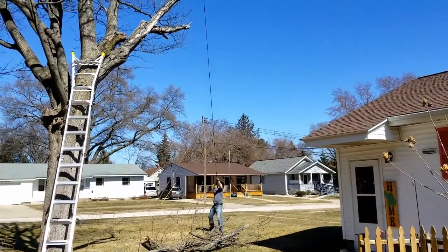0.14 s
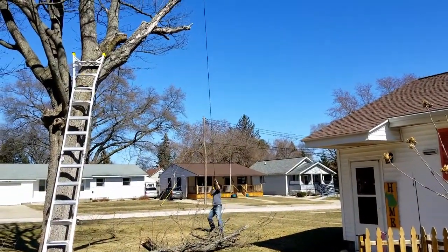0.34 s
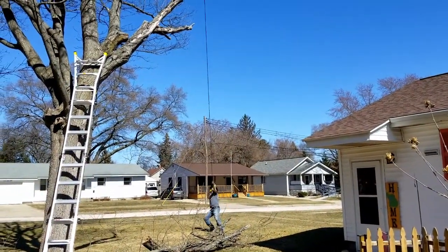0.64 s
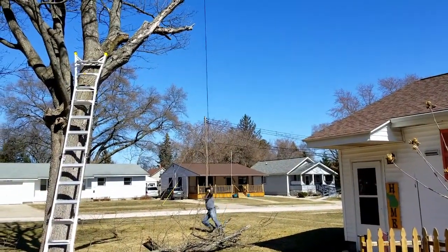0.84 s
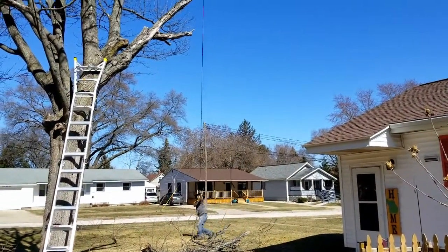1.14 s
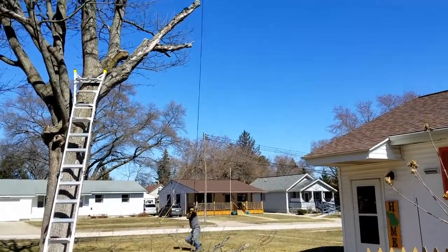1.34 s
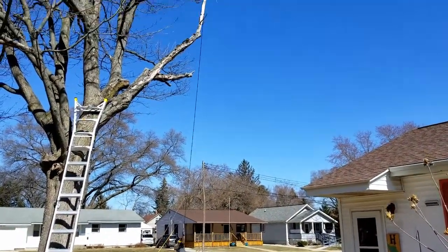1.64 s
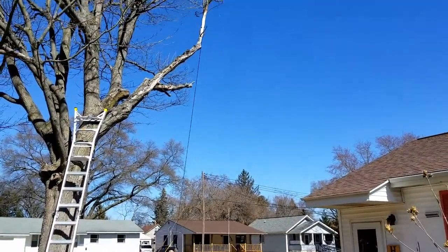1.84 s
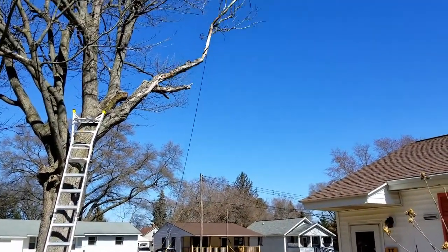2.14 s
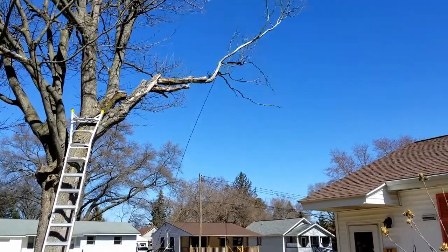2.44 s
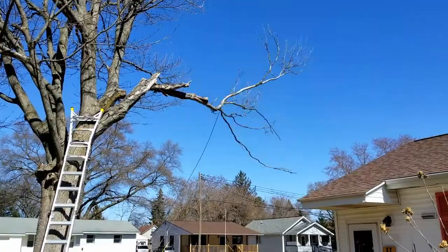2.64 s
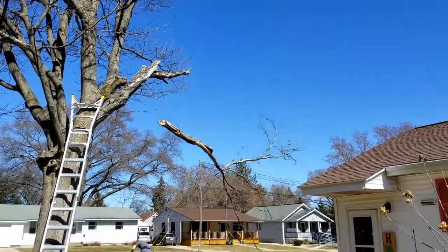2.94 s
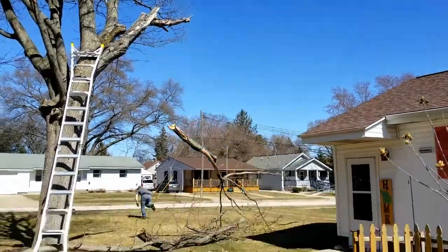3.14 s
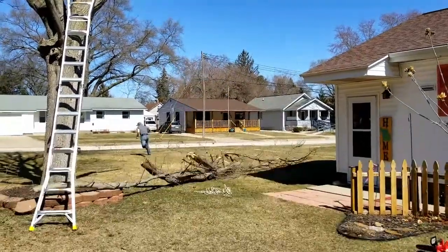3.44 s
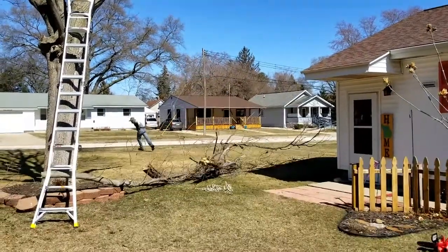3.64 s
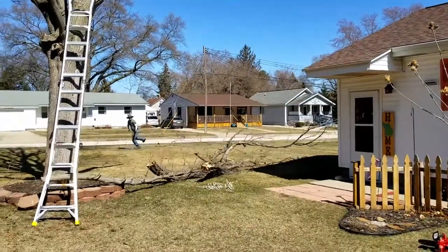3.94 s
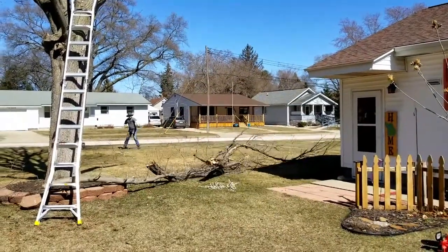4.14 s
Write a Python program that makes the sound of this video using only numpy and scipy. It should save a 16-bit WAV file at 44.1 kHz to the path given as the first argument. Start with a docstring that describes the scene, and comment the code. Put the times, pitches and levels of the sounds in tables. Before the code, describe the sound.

Loud wood cracks echo off nearby houses, a brief hush follows, then a heavy branch hits grass with clattering thuds and snapping twigs.

```python
"""A sawn limb tears off a yard tree: its hinge wood cracks in steps as bursts of tiny fractures
drive filters, over a ringing limb. Its twigs rustle, then snap and crackle on the lawn as noise grains
through resonances; the heavy wood knocks, bounces, scrapes and settles. Houses throw it back as filtered
echoes. Behind it, shaped noise makes a breeze rumbling on two microphones, traffic murmur and
airy hiss, and a far bird calls twice in wavering harmonics."""
import sys
import numpy as np
from scipy import signal
from scipy.fft import rfft, irfft, next_fast_len
from scipy.io import wavfile
from scipy.ndimage import uniform_filter1d, minimum_filter1d

SR = 44100
rng = np.random.default_rng(int(sys.argv[2]) if len(sys.argv) > 2 else 0)


def transcribe(u):
    """Save the signal u as a 16-bit wav file named by the first command-line argument.

    u: samples, shape (n,) or (channels, n), limited to [-1, 1]; the rate is SR.
    q: integer samples, one column per channel.
    """
    v = np.clip(np.atleast_2d(u).T, -1, 1)
    q = np.round(v * 32767).astype(np.int16)
    wavfile.write(sys.argv[1], SR, q)


N = 189674
T = np.arange(N) / SR
HIT = T[:SR // 3]  # time axis of one short event

# fibre bundles breaking in the hinge
# (time [s], tear level [dB], ring level [dB], splinter level [dB], tear pitch [Hz], decay [s])
CRACKS = [(0.4882, -34.5, -37.5, -37, 1630, .012), (0.587, -43, -49, -43, 1640, .012),
          (0.619, -15.5, -24.5, -28, 2720, 0.0059), (0.7556, -20.5, -23.5, -30.5, 1550, 0.0071),
          (0.8952, -11, -11.5, -22.5, 2970, 0.0094), (0.983, -22, -32, -30.5, 1075, 0.0045),
          (1.0095, -29.5, -45, -40.5, 1090, 0.0047), (1.024, -15.5, -30.5, -25.5, 1790, 0.0042),
          (1.076, -33.5, -41, -40, 1790, 0.0046), (1.823, -44, -39, -40, 1165, 0.0054),
          (1.833, -21.5, -32.5, -29, 1290, 0.0046), (1.8585, -2.5, -4.5, -10.5, 1900, .0036),
          (1.8649, -10.5, -38, -18, 1350, 0.0047), (1.887, -23.5, -24, -20, 1160, 0.006),
          (2.607, -39.5, -49, -52, 1170, 0.021), (2.642, -44.5, -52.5, -48, 1720, 0.015)]
# the limb while still on the tree (frequency [Hz], level at 0 dB ring [dB], fall by 60 dB [s])
HINGE_MODES = [(420, 3, .085), (598, 0, .07), (665, -6, .06)]
# weak breaks stir the upper modes more (dB per octave, for each dB under full strength)
RING_TILT = 0.56
# higher bending modes of the limb, stirred by tearing (frequency [Hz], width [Hz], level [dB])
TEAR_MODES = [(1070, 130, 3), (1198, 97, 6), (1420, 26, -5.5), (1700, 234, 3.5), (2426, 91, -7),
              (3145, 34, -4.5)]
# spectra of tearing wood and of flying splinters (frequency [Hz], relative level [dB])
TEAR_COLOUR = [(300, -42), (700, 7.5), (1100, -3.5), (1700, -5.5), (2100, -5.5), (2900, -6), (3900, -22.5),
               (6000, -30)]
SPLINTER_COLOUR = [(1000, -64.5), (3000, 7), (4600, 4), (6500, 0.5), (9000, -3), (12500, 2.5), (16000, -9)]
# only a tear slower than FLEX_S has time to flex the whole limb; level against the ring
FLEX_DB, FLEX_S = -3, 0.0037
# loose bits trickle from the hinge after each break; level against the tear
SHED_DB, SHED_RELEASE_S = -44.5, 0.17

# the loudest twigs and splinters snapping (time [s], level [dB], pitch [Hz], decay scale [s])
SNAPS = [(0.7718, -44, 8600, 0.011), (0.899, -15, 3920, 0.0037), (0.95, -37, 8950, 0.0018),
         (1.002, -37, 9300, 0.0023), (2.383, -46.5, 3450, 0.0012), (2.426, -48, 6360, .0027),
         (2.499, -47.5, 4540, 0.0087), (2.971, -52, 5000, 0.0047), (3.068, -39.5, 6000, 0.0036),
         (3.0893, -14, 3970, 0.0044), (3.129, -18, 3700, 0.0093), (3.153, -26.5, 4500, 0.0036),
         (3.169, -24, 2540, 0.0088), (3.22, -17.5, 3300, 0.0056), (3.234, -21, 5400, 0.013),
         (3.283, -25.5, 5300, 0.0066), (3.322, -25.5, 6760, 0.019), (3.3904, -14, 5470, .004),
         (3.405, -20.5, 4700, 0.0022), (3.425, -24, 4590, .003), (3.435, -17.5, 5270, 0.0043),
         (3.497, -26, 3970, 0.002), (3.55, -29, 9700, 0.004), (3.557, -26.5, 4230, 0.0037),
         (3.605, -32, 4660, 0.0026), (3.7, -34.5, 4200, .0034), (3.8029, -24.5, 6830, 0.0042),
         (3.8318, -34.5, 5600, .0042), (3.943, -35, 2520, 0.014), (3.993, -41, 2440, 0.0081),
         (4.155, -40, 6800, 0.0071), (4.263, -41, 1240, .008)]
# spectrum of breaking twigs (frequency [Hz], relative level [dB])
TWIG_COLOUR = [(60, -53.5), (300, 5.5), (900, -4), (2000, 4.5), (4500, -3), (7000, -4.5), (12000, 2.5),
               (16000, -9)]
# weaker twigs snap at random: rate, level at 0 dB stir and its spread, pitch and its spread, decay scale
STRAY_PER_S, STRAY_DB, STRAY_SCATTER_DB = 20, -8, 3
STRAY_HZ, STRAY_OCTAVES, STRAY_DECAY_S = 5800, .4, .004
STRAY_GROWTH = 0.7  # dB of snap per dB of stir

# branches and butt striking the lawn (time [s], level [dB], pitch [Hz], decay [s])
BLOWS = [(3.084, -25.5, 542, 0.011), (3.104, -28, 570, 0.022), (3.1246, -24, 636, .008),
         (3.216, -15.5, 710, 0.013), (3.230, -22, 730, 0.017), (3.279, -8.5, 760, 0.01),
         (3.293, -19.5, 313, 0.015), (3.329, -26, 816, 0.036), (3.369, -21.5, 487, .012),
         (3.382, -12, 330, 0.027), (3.404, -21.5, 360, 0.019), (3.45, -22, 694, 0.018),
         (3.465, -22, 335, 0.017), (3.569, -34, 124.7, 0.048), (3.626, -26.5, 151, 0.0087),
         (3.799, -27.5, 860, 0.011), (3.805, -23, 248, 0.02), (3.835, -34.5, 560, 0.049),
         (3.895, -18.5, 449, 0.0073), (3.903, -21.5, 487, 0.04), (4.257, -33.5, 253, 0.013)]
BLOW_RISE_S = 0.00293  # the turf gives before it stops the wood
# the loose limb (frequency [Hz], width [Hz], relative level [dB])
LIMB_MODES = [(96, 74, 14), (170, 260, -6.5), (244, 45, -2), (317, 37, 6.5), (470, 43, 2.5), (520, 96, -10),
              (663, 140, 0), (723, 150, 5.5), (880, 69, 0), (1075, 93, 3), (1115, 72, 2.5), (1456, 220, 1),
              (2360, 100, -7.5)]
# the crown pressing into the lawn: tips, side branch, full weight, two rebounds, settling
# (time [s], stir level [dB], release [s])
CRUSH = [(3.10, -40.5, 0.25), (3.208, -28, 0.17), (3.358, -28, 0.1), (3.799, -38, 0.034),
         (3.89, -41, 0.033), (4.058, -56.5, 1)]
CRUSH_ATTACK_S = 0.011
# twigs rustle while the crown swings down (start [s], length [s], stir level [dB])
SWING = (2.15, 0.99, -69)
# a branch scraping as the limb settles
SCRAPE_S, SCRAPE_DB, SCRAPE_ATTACK_S, SCRAPE_RELEASE_S = 3.893, -37, .022, 0.015
SQUEAL_HZ, SQUEAL_WIDTH_HZ = 5250, 450

# echoes off houses and fences (delay [s], level [dB], centre [Hz], width [Hz])
ECHOES = [(0.052, -20.5, 3470, 737), (0.084, -10, 2260, 350), (0.149, -21, 1503, 2270),
          (.187, -22.5, 1216, 2450), (.251, -25, 1400, 2200), (0.321, -30.5, 1360, 2460)]
# how squarely the breaking wood faces the houses as the limb swings out (time [s], level [dB])
FACING = [(0, 25), (.8, -18), (1.0, -15.5), (1.3, 1), (1.8, -2), (2.6, -15), (4.3, 16)]
# colour of the scattered tail (frequency [Hz], level [dB])
YARD_COLOUR = [(60, 0.5), (250, 1.5), (600, -6), (1200, -6.5), (2500, -1.5), (6000, -0.5), (15000, 1.5)]
# the microphone pair: side against mid, then left against right (frequency [Hz], level difference [dB])
WIDTH = [(100, -36), (400, -24), (900, -11.5), (1400, -2), (2200, -4.5), (4000, -1), (15000, -1)]
LEAN = [(60, 4.5), (200, -1), (400, -3), (700, -4.5), (1300, -3), (2400, -3.5), (4400, -8), (8000, -4),
        (15000, -1.5)]
TOP_HZ = 15600

# gusts that swell and die on the microphones (start [s], length [s], relative level [dB])
GUSTS = [(-.4, 1.7, -46), (0.733, 0.38, -36), (1.047, .32, -39.5), (2.122, 0.35, -49.5), (2.9, 0.38, -45.5),
         (3.246, 1.13, -42.5), (4.122, .36, -33.5)]
CALM_DB = -52.5  # the breeze between gusts, on the same scale
# strong puffs of air on the microphones (time [s], relative level [dB], pitch [Hz])
PUFFS = [(0.798, -26.5, 142), (0.869, -32, 64), (1.031, -24.5, 115), (1.054, -21.5, 92),
         (1.191, -39.5, 74.5), (2.193, -45, 132), (3.0, -36, 125), (4.2, -26.5, 83.3), (4.222, -32, 140)]
# spectrum of the breeze (frequency [Hz], relative level [dB])
RUMBLE_COLOUR = [(15, -21), (30, -5.5), (55, 4), (85, 4), (130, -6), (220, -13.5), (500, -65.5)]
# the bird's two nasal calls (start [s], length [s], pitch [Hz], level [dB])
CALLS_OF_BIRD = [(0.0, 0.5, 878, -57.5), (2.6, 0.42, 858, -68.5)]
# the overtones of a call (multiple of the pitch [1], relative level [dB])
CALL_HARMONICS = [(2, -12), (3, -6.5), (4, -1.5), (5, -23), (6, -17), (7, -17), (8, -15), (10, -34)]
# each call scoops up to its pitch, then sags as it runs out (shares of the pitch; s)
SCOOP, SAG, SCOOP_S = 0.078, 0.15, 0.0148
CALL_SKEW = 0.57  # under 1: loudest before the middle
# distant traffic before its slight wander (time [s], level [dB])
TRAFFIC = [(0, -53.5), (.5, -51), (1.3, -52), (1.8, -52.5), (2.4, -52.5), (2.9, -54), (4.3, -47.5)]
# spectra of the traffic and of the airy hiss (frequency [Hz], relative level [dB])
TRAFFIC_COLOUR = [(60, -44.5), (170, -16), (280, 8.5), (380, -1), (520, 3), (700, -10), (950, -37),
                  (2000, -82)]
AIR_COLOUR = [(300, 13), (1000, -2), (2000, -1), (3500, -2), (6500, -4), (8500, -17), (10500, -12),
              (12800, -5.5), (16000, -7)]


def undb(db):
    """Decibels to gain."""
    return 10 ** (np.asarray(db) / 20)


def curve(rows, axis=1):
    """One column of a time table at every sample."""
    rows = np.asarray(rows)
    return np.interp(T, rows[:, 0], rows[:, axis])


def colour(x, points):
    """Causal, minimum-phase filter with a (frequency [Hz], level [dB]) response."""
    size = 2 * next_fast_len(x.shape[-1])
    hz, db = np.transpose(points)
    f = np.maximum(np.arange(size // 2 + 1) * SR / size, 1)
    response_db = np.interp(np.log(f), np.log(hz), db)
    # folding the cepstrum onto positive times makes the filter causal
    cepstrum = irfft(np.log(undb(response_db)))
    cepstrum[1:size // 2] *= 2
    cepstrum[size // 2 + 1:] = 0
    return irfft(rfft(x, size) * np.exp(rfft(cepstrum)))[..., :x.shape[-1]]


def band(x, hz, width_hz):
    """One resonance, gain 1 at its centre."""
    centre_hz = min(hz, SR / 2 - SR / 20)
    sharpness = hz / min(width_hz, SR / 2 - SR / 10)
    return signal.lfilter(*signal.iirpeak(centre_hz, sharpness, SR), x)


def resonances(x, modes):
    """A body's bending modes, all driven by the same force."""
    return sum(undb(db) * band(x, hz, width_hz) for hz, width_hz, db in modes)


def unit(x):
    """Scale to rms 1."""
    return x / np.sqrt(np.mean(x ** 2))


def loudest(x, db):
    """Scale each row by itself so that its loudest 5 ms has this level."""
    power = uniform_filter1d(x ** 2, size=220)
    return x * undb(db) / np.sqrt(power.max(axis=-1, keepdims=True))


def walk(rate):
    """Smooth random wander through `rate` knots a second, spread near 1."""
    knots = rng.standard_normal(int(T[-1] * rate) + 2)
    return np.interp(T * rate, np.arange(len(knots)), knots)


def grains(rate, spread_db, size):
    """Tiny fractures of very uneven strength, as mid and side rows."""
    present = rng.random((2, size)) < rate / SR
    strength_db = spread_db * np.minimum(rng.exponential(size=(2, size)), 4)
    return present * rng.standard_normal((2, size)) * undb(strength_db)


def add(out, s, sound):
    """Mix a sound in at a time."""
    i = int(s * SR)
    out[:, i:i + sound.shape[-1]] += sound[..., :N - i]


def swell(s, db, attack_s, release_s):
    """Gain that rises from a moment and then dies away."""
    age = np.maximum(T - s, 0)
    rise = np.minimum(age / attack_s, 1)
    return undb(db) * rise * np.exp(-np.maximum(age - attack_s, 0) / release_s)


def arch(s, length_s, db, skew=1):
    """Gain that comes and goes in one smooth arc."""
    return undb(db) * np.sin(np.pi * np.clip((T - s) / length_s, 0, 1) ** skew)


def together(gains):
    """Gain of several unrelated sounds: their powers add."""
    return np.sqrt(sum(gain ** 2 for gain in gains))


def fracture(decay_s, rate=9000, spread_db=3, first=5):
    """After a very short rise, one main fibre gives way and a dying cascade of others follows."""
    rise_s = .0007
    envelope = np.exp(-HIT / decay_s) * np.minimum(HIT / rise_s, 1)
    cascade = unit(grains(rate, spread_db, len(HIT))) * envelope
    cascade[:, int(rise_s * SR)] += first * np.sqrt(decay_s * SR) / 10
    return cascade


def hinge_ring(ring_db):
    """Decaying sines of the limb on the tree; neighbouring modes swing against each other."""
    tilt = -RING_TILT * ring_db
    lowest_hz = HINGE_MODES[0][0]
    ring = 0
    for k, (hz, db, t60) in enumerate(HINGE_MODES):
        level_db = db + tilt * np.log2(hz / lowest_hz) - 60 * HIT / t60
        ring = ring + (-1) ** k * undb(level_db) * np.sin(2 * np.pi * hz * HIT)
    return loudest(ring, ring_db)


def limb_flex(ring_db, decay_s):
    """A soft, short low note as the whole limb bends; quick tears barely excite it."""
    flex_db = ring_db + FLEX_DB - 20 * np.log10(1 + (FLEX_S / decay_s) ** 4)
    envelope = np.exp(-HIT / 0.0036) * (1 - np.exp(-HIT / 0.0037))
    return loudest(np.sin(2 * np.pi * 245 * HIT) * envelope, flex_db)


def cracks():
    """Each break flexes the limb, rings it, tears the grain and throws splinters."""
    out = np.zeros((2, N))
    for s, tear_db, ring_db, splinter_db, tear_hz, decay_s in CRACKS:
        fibres = colour(fracture(decay_s, first=2.76), TEAR_COLOUR)
        fibres = fibres + resonances(fibres, TEAR_MODES)
        # each bundle favours the note of its own length
        tear = fibres + undb(1) * band(fibres, tear_hz, tear_hz * 0.12)
        burst = fracture(decay_s * 0.81, rate=5500, spread_db=2.5, first=2.9)
        splinters = colour(burst, SPLINTER_COLOUR)
        add(out[:1], s, hinge_ring(ring_db) - limb_flex(ring_db, decay_s))
        add(out, s, loudest(tear, tear_db) + loudest(splinters, splinter_db))
    lowest_hz = 150  # the breaks carry no deep bass
    return signal.sosfilt(signal.butter(3, lowest_hz, "high", fs=SR, output="sos"), out)


def blows():
    """Bark grinds into turf, stops with a knock and rings the limb; each blow has its own note."""
    out = np.zeros((2, N))
    for s, db, hz, decay_s in BLOWS:
        envelope = np.minimum(HIT / BLOW_RISE_S, 1) * np.exp(-HIT / decay_s)
        push = unit(grains(2500, 1.8, len(HIT))) * envelope
        push[0, int(BLOW_RISE_S * SR)] += 4  # the knock
        thud = resonances(push, LIMB_MODES) + undb(3.5) * push
        add(out, s, loudest(band(band(thud, hz, hz * 0.47), hz, hz * 2), db))
    return out


def stirring():
    """How hard the crown's twigs are worked: lightly in the swing, then at each contact with the lawn."""
    presses = [swell(s, db, CRUSH_ATTACK_S, release_s) for s, db, release_s in CRUSH]
    return together([arch(*SWING)] + presses)


def snap(db, hz, decay_s):
    """A dry twig: a sharp click and the brief note of the stub."""
    burst = fracture(decay_s * 0.55, rate=14000, spread_db=3.0, first=2.4)
    click = colour(burst, TWIG_COLOUR)
    return loudest(undb(-12.5) * click + band(click, hz, hz * 0.49), db)


def snaps():
    """The loud snaps, and stray ones that grow louder as the crown is stirred harder."""
    out, stir = np.zeros((2, N)), stirring()
    for s, db, hz, decay_s in SNAPS:
        add(out, s, snap(db, hz, decay_s))
    # one stray twig at a random moment of each slot
    for slot in np.arange(SWING[0], T[-1] - 1 / STRAY_PER_S, 1 / STRAY_PER_S):
        s = slot + rng.random() / STRAY_PER_S
        strength, size = rng.standard_normal(2)
        hz = STRAY_HZ * 2 ** (STRAY_OCTAVES * size)
        twig = snap(STRAY_DB + STRAY_SCATTER_DB * strength, hz, STRAY_DECAY_S)
        add(out, s, stir[int(s * SR)] ** STRAY_GROWTH * twig)
    return out


def crush():
    """Many thin twigs break, each size with its own note, with sticks knocking and a swish of grass."""
    sizes_hz = np.geomspace(2200, 14000, num=9)
    crackle = sum(unit(band(grains(330, 4, N), hz, hz * 0.16)) for hz in sizes_hz)
    swish = unit(rng.standard_normal((2, N)))
    twigs = unit(colour(unit(crackle) + undb(-2.0) * swish, TWIG_COLOUR))
    knocks = grains(660, 0.89, N)
    sticks = unit(band(resonances(knocks, LIMB_MODES), 530, 770))
    bunches_db = 3 * walk(110)  # twigs give way in bunches
    # bits shed by the hinge share this texture
    shed = [swell(s, tear_db + SHED_DB, CRUSH_ATTACK_S, SHED_RELEASE_S) for s, tear_db, *_ in CRACKS]
    return (twigs + undb(2.5) * sticks) * together(shed + [stirring()]) * undb(bunches_db)


def scrape():
    """Sticking and slipping bark makes a thin branch squeal: dense grains through a narrow resonance."""
    squeal = band(grains(1800, 6.1, N), SQUEAL_HZ, SQUEAL_WIDTH_HZ)
    squeal = unit(band(squeal, SQUEAL_HZ, 2 * SQUEAL_WIDTH_HZ))
    return squeal * swell(SCRAPE_S, SCRAPE_DB, SCRAPE_ATTACK_S, SCRAPE_RELEASE_S)


def yard(aloft, lawn):
    """Walls and fences send back smeared, coloured echoes; trees and roofs scatter a faint tail."""
    t = T[:SR * 3 // 2]
    # a quick and a slow decay, falling 60 dB in 0.13 s and 1.27 s
    decay = undb(-37.0 - 60 * t / 0.13) + undb(-57.5 - 60 * t / 1.27)
    rise = np.minimum(t / 0.0061, 1)
    scatter = colour(rng.standard_normal((2, len(t))) * decay * rise, YARD_COLOUR)
    walls = 0
    for delay_s, db, hz, width_hz in ECHOES:
        envelope = (t >= delay_s) * np.exp(-abs(t - delay_s) / .005)
        smear = unit(rng.standard_normal((2, len(t))) * envelope) / np.sqrt(len(t))
        walls = walls + undb(db) * band(band(smear, hz, width_hz), hz, 2 * width_hz)
    # the lawn reaches the houses at half strength, the tree as it faces them
    outward = aloft * undb(curve(FACING)) + lawn / 2
    echoes = signal.fftconvolve(outward[:1], walls, axes=1)
    tail = signal.fftconvolve((aloft + lawn)[:1], scatter, axes=1)
    # ever-changing paths blur the pitch of what comes back
    path_s = .00025 * walk(220)
    return np.array([np.interp(T - path_s, T, row[:N]) for row in echoes + tail])


def microphones(mid_side):
    """Bass is nearly alike at both ports, treble is not; above the bass the right is louder."""
    mid, side = mid_side[0], colour(mid_side[1], WIDTH)
    ports = []
    for sign in (1, -1):
        half_lean = [(hz, sign * db / 2) for hz, db in LEAN]
        ports.append(colour(mid + sign * side, half_lean))
    return np.array(ports)


def breeze():
    """Eddies rumble at each port separately; now and then a stronger puff thumps."""
    wind = together([undb(CALM_DB)] + [arch(*gust) for gust in GUSTS])
    rumble = unit(colour(rng.standard_normal((2, N)), RUMBLE_COLOUR))
    out = rumble * wind * undb(1.3 * walk(24) + 3.0)
    for s, db, hz in PUFFS:
        eddy = rng.standard_normal((2, len(HIT))) * np.exp(-HIT / .012)
        add(out, s, loudest(band(band(eddy, hz, hz), hz, hz), db))
    return out * undb(np.array([[1.8], [-1.8]]))  # stronger on the left


def bird():
    """Harsh, falling nasal calls from far off: in each call two unsteady, wavering harmonic voices overlap."""
    out = 0
    for s, length_s, hz, call_db in CALLS_OF_BIRD:
        age = np.clip(T - s, 0, length_s)
        pitch = hz * (1 - SCOOP * np.exp(-age / SCOOP_S) - SAG * (age / length_s) ** 3)
        voice = 0
        for _ in range(2):
            rough_pitch = pitch * (1 + .021 * walk(600))
            phase = 2 * np.pi * np.cumsum(rough_pitch) / SR
            for k, db in CALL_HARMONICS:
                voice = voice + undb(db + 2 * walk(56)) * np.sin(k * phase)
        out = out + unit(voice) * undb(call_db) * arch(s, length_s, 0, CALL_SKEW) ** 2
    return out


def street():
    """Far traffic, mostly alike in both ears, under a thin airy hiss: two bands of shaped noise."""
    shared = rng.standard_normal(N)
    separate = rng.standard_normal((2, N)) / 2
    traffic = unit(colour(shared + separate, TRAFFIC_COLOUR))
    traffic = traffic * undb(curve(TRAFFIC) + 0.2 * walk(9.1))
    air = unit(colour(rng.standard_normal((2, N)), AIR_COLOUR))
    return traffic + air * undb(-57.5 + walk(5.8) / 2)


def scene():
    """The limb in the tree and on the lawn, the yard's answer, and the quiet day around them."""
    aloft = cracks()
    lawn = blows() + snaps() + crush() + scrape()
    limb = microphones(aloft + lawn + yard(aloft, lawn))
    return limb + breeze() + bird() + street()


def record(dry):
    """A fast limiter holds the loudest cracks at full scale; the top is cut."""
    x = signal.sosfilt(signal.ellip(8, .2, 70, TOP_HZ, fs=SR, output="sos"), dry)
    room_left = 1 / np.maximum(abs(x).max(axis=0), 1)
    return x * uniform_filter1d(minimum_filter1d(room_left, size=65), size=65)


dry = scene()
out = record(dry)
transcribe(out)
```